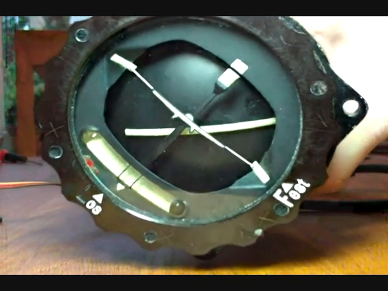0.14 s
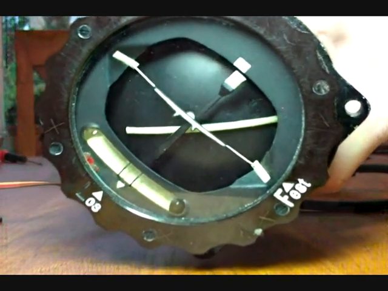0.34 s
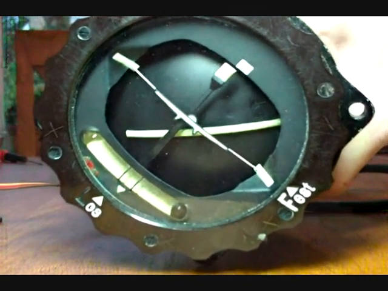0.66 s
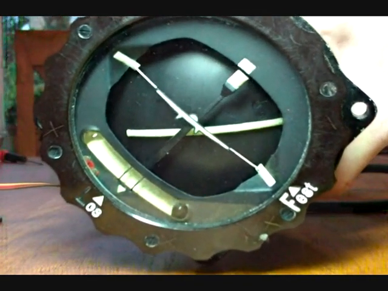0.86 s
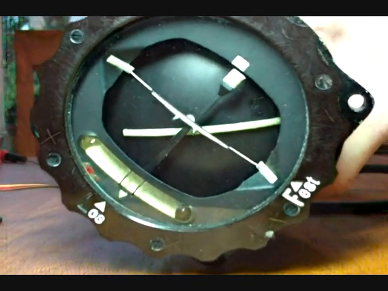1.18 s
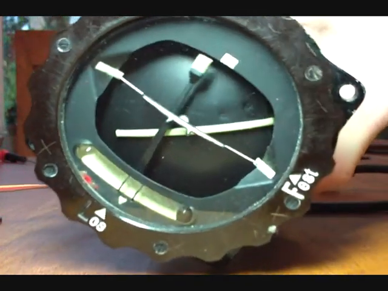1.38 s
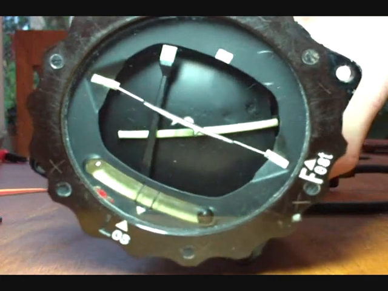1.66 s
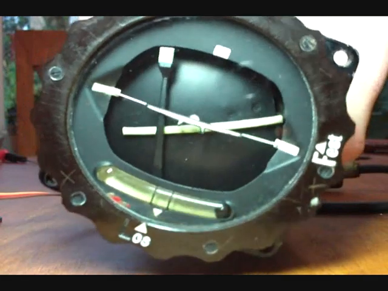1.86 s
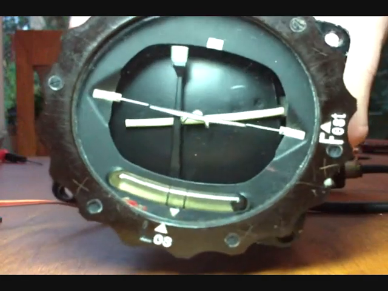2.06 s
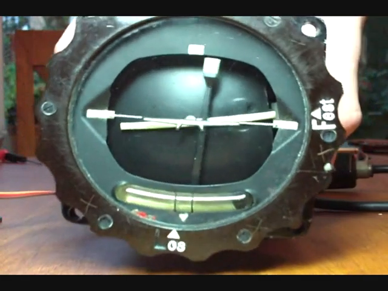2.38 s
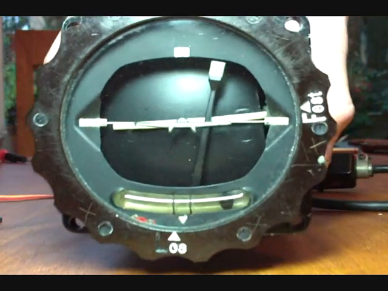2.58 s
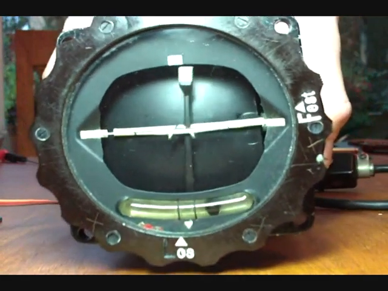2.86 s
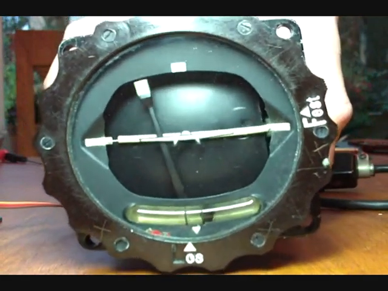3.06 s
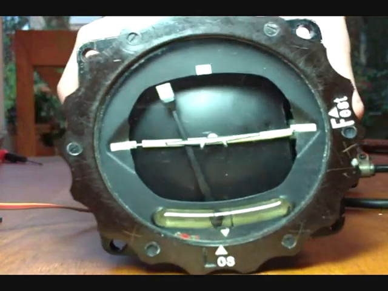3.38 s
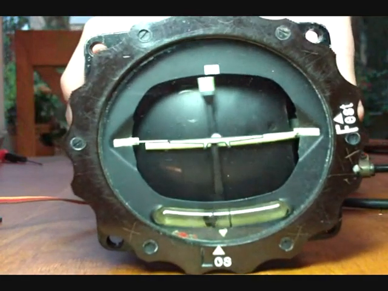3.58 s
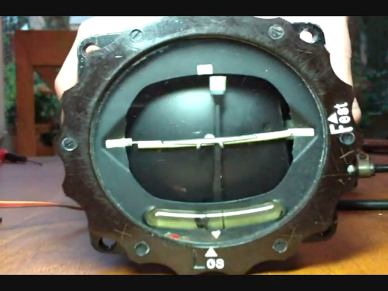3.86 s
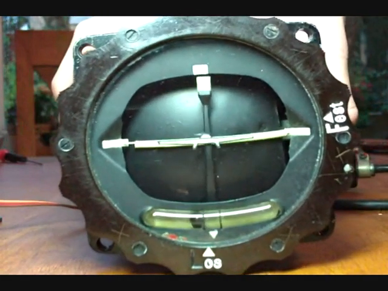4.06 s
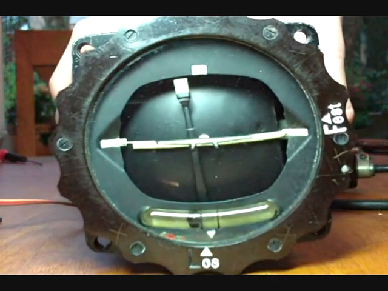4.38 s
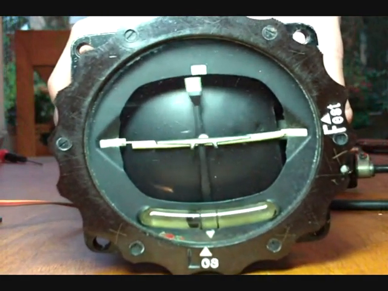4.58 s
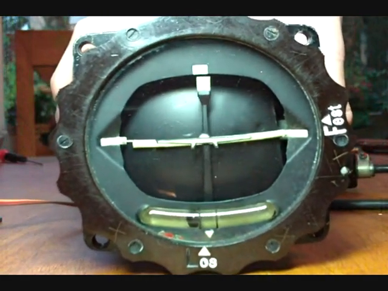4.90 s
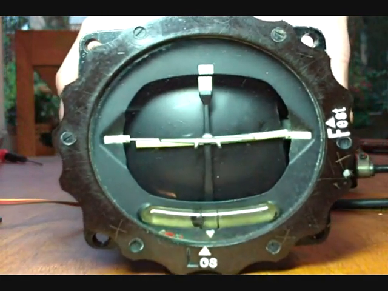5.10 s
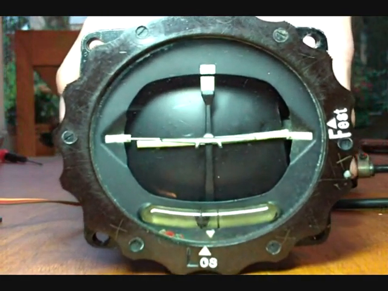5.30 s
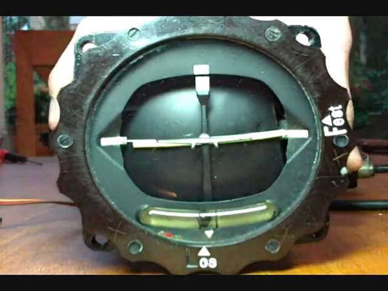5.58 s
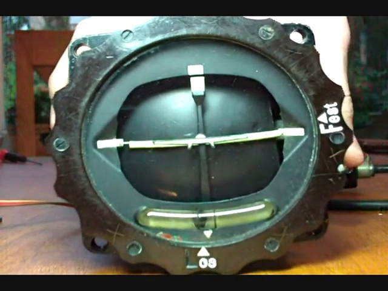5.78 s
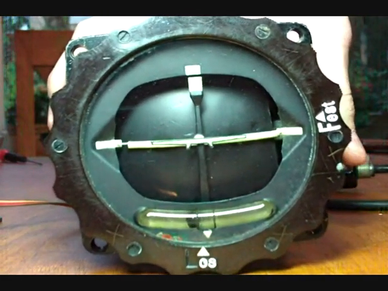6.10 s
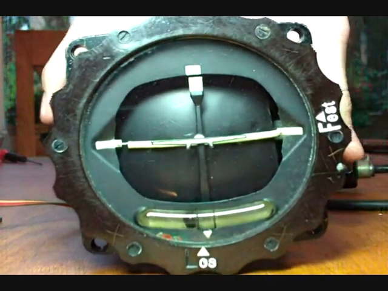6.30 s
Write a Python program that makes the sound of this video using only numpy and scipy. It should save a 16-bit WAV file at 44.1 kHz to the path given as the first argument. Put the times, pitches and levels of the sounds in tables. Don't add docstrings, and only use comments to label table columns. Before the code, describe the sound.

From 0 s an electric gyro instrument is already running at full, practically unchanging speed, close to a cheap microphone over a wooden bench. A strong low hum near 120 Hz carries a dense, nasal whine around 1 kHz, thinner higher motor tones, a slow beating about once a second, and rough hiss from air and bearings, fluttering with tiny jolts. The treble is dull and slightly grainy. Soft low handling thumps come near 0.2 and 1.5 s. From about 1.9 to 2.7 s the casing is rolled level and some whines swell while others fade. More muffled bumps and faint creaks cluster at 3.0-3.6 s. Around 4.7-5.1 s it is pressed to the bench, with a creak and a fuller lower ring; a small shift follows near 5.9 s. At 6.28-6.33 s several rapid, hard wooden knocks with metallic rattle overload the microphone, ringing briefly until the abrupt end near 6.4 s.

```python
import sys
import numpy as np
from scipy import signal
from scipy.fft import rfft, irfft
from scipy.io import wavfile
from scipy.ndimage import uniform_filter1d

SR = 44100
rng = np.random.default_rng(int(sys.argv[2]) if len(sys.argv) > 2 else 0)


def int16_out(signal):
    q = np.round(np.clip(np.atleast_2d(signal).T, -1, 1) * 32767)
    wavfile.write(sys.argv[1], SR, q.astype(np.int16))


def voltage_ratio(level):
    return 10 ** (np.asarray(level, float) / 20)


N = 284004
SHAFT_HZ = 122.14

# t/s, speed change/%
SPEED_DRIFT = [(0, 0), (1.6, 0), (2.1, .03), (3, .005), (4, 0), (5, 0), (6.44, -.012)]
# t/s, rolled level/0-1, pressed on the bench/0-1
POSE = [
    (0, 0.2, 0.15),
    (1.9, 0, 0),
    (2.25, 0.5, 0.1),
    (2.7, 0.95, 0.01),
    (4.5, 1, 0.2),
    (4.75, 0.97, .45),
    (4.98, 0.89, 0.9),
    (6.44, 0.9, 1),
]
SHAFT_ORDERS = [2, 5, 7, 16, 21, 22, 23, 24, 25, 26, 27, 28, 29, 30, 31, 36, 37, 38, 40, 43, 45, 47, 52, 55,
                59, 60]
SHAFT_DB = [-39, -45, -37, -38, -51, -54, -56, -50, -46, -56, -61, -58, -59, -59, -57, -56, -57, -61, -61,
            -61, -58, -66, -70, -60, -66, -70]
MOTOR_HZ = [100.3, 240.9, 490.6, 862, 1597.5, 1845, 1928.6, 1962.8, 2249.5, 2331.2, 2336.8, 2458.8, 2575.9,
            2664.1, 2950.7, 3072.5, 4293.9, 4784.4, 5028.7, 5409.5, 5437.8]
MOTOR_DB = [-47, -44, -43, -39, -48, -30.5, -47, -43, -49, -42, -46, -52, -52, -51, -48, -52, -56, -59, -59,
            -56, -57]
BEAMED_HZ = [440.1, 582.7, 766.4, 880.2, 1018.1, 1181.7, 1206, 1319.8, 1646.6, 1760.3, 2062.3, 2087]
# tilted level/dB, change when level/dB, change when pressed/dB, creep/(Hz/s)
BEAMED = [(-43, -3, 8, 0), (-52, 2, 8, 0), (-30, 0, -7, .12), (-40, 14.5, -2, .06), (-42, 6, 2, 0),
          (-33, -6, -3, .2), (-30, -10, -3, .25), (-33, -5, -2, .2), (-54, 3, -2, .25), (-50, 1, 2, .1),
          (-45, 4, -4, .3), (-51, 3, 1, .3)]
SING_HZ = [234.8, 470.2, 704.6, 939.6, 971.2]
SING_WANDER_HZ = [.4, 1, 1, 1.17, 1.995]
# tilted level/dB, change when level/dB, change when pressed/dB, dropout depth/dB, shake share/0-1
SING = [(-46.5, 6, 19, 0.6, 0), (-43.5, 3, -0.5, 4.5, 0.2), (-39.5, 3, 0.5, 2, .3),
        (-24, -0.5, 1.5, 3.5, 0.1), (-23, 1.5, -3.5, 3.5, .7)]
# middle t/s, length/s, rise/dB
SWELLS = [
    [(1.6, .15, 8), (2.0, 0.34, 5), (4.48, 0.17, 6)],
    [(1.76, 0.27, 15), (2.6, 1.1, 13), (3.6, 1.6, 10.5), (4.31, 0.17, 6), (4.93, .2, 10.5), (5.45, 0.34, 6)],
    [(.62, 0.33, 8), (1.8, 0.7, 5), (2.96, 0.22, 8.5), (3.72, 0.53, 6.5), (4.25, 0.31, 8), (4.7, 0.6, 9.5),
     (5.55, 0.48, 7.5)],
    [(.38, 0.47, 5), (1.0, .6, 3.5), (1.5, 0.17, 6), (2.05, 1, 6), (2.9, 0.74, 2.5), (3.55, 0.5, -9),
     (5.55, 1.0, 8), (6.03, 0.24, 3)],
    [(2.0, .5, 4.5), (2.6, 0.63, 4), (3.5, 0.56, 1), (4.12, 0.19, 4.5), (4.5, 0.37, 3), (4.9, .5, 2.5),
     (5.7, .3, 2.5)],
]
# t/s, level/dB
SHAKE = [(0.0, -18.5), (0.03, -26), (0.31, -18.5), (0.84, -20), (0.87, -17.5), (1.46, -23), (1.53, -14.5),
         (1.6, -24), (1.92, -17), (2.14, -21), (3.9, -17), (4.15, -12.5), (4.17, -17.5), (4.92, -18),
         (5.75, -14.5), (5.8, -18.5), (6.26, -18), (6.4, -20)]
# middle t/s, length/s, rise/dB
JOLTS = [(.14, .06, 6.5), (.47, 0.073, 4.5), (.64, .06, 4.5), (1.13, .08, 3), (1.33, .08, 6.5),
         (1.52, 0.11, 3.5), (2.3, .1, 3), (2.47, 0.091, 3), (2.72, .08, 6), (2.87, .1, 6.5), (3.33, .06, 4),
         (3.42, .1, -7), (3.62, .1, 4), (3.79, .08, 6.5), (4.72, .08, 5), (5.1, .08, 3.5), (5.43, .08, 2),
         (5.97, .06, 2.5), (6.09, .08, 3), (6.19, .08, 3), (6.26, .05, 3), (6.33, 0.057, 6.5)]
# f/Hz, level/dB per Hz
HISS = [(200, -64.5), (330, -67), (520, -59), (800, -58), (1230, -56.5), (1600, -60.5), (2000, -59.5),
        (2600, -64), (3200, -70.5), (3650, -73.5), (4400, -74.5), (5100, -75), (5900, -89), (7200, -89)]
# f/Hz, width/Hz, level/dB per Hz
CASING = [(480.4, 17, -53), (644, 80, -58), (717, 60, -51.5), (873, 13, -47), (887, 20, -51.5),
          (960, 52, -40.5), (983, 56, -43.5), (1073, 33, -51.5), (1153, 50, -54.5), (1330, 21, -47.5),
          (1406, 50, -48), (1470, 36, -49.5), (1532, 40, -53), (3942, 200, -68.5), (4425, 200, -73),
          (4630, 230, -74), (5368, 280, -70.5), (5820, 150, -81.5)]
# middle t/s, length/s, thump rise/dB, creak rise/dB
SHIFTS = [(.2, 0.18, 19, -4), (1.48, 0.14, 14, 10), (2.17, 0.2, 5, 10), (2.52, .1, 10, -7),
          (3.04, .2, 20, 6), (3.12, .16, 6, 16), (3.2, .2, 21, 8), (3.42, .25, 15, 12), (3.64, .1, 20, -2),
          (4.11, .1, -2, 6), (4.84, 0.25, 3, 12), (5.08, .14, 15, 6), (5.81, 0.09, 8, 5),
          (5.94, 0.11, 8, 4)]
# t/s, blow/dB, contact/ms, wood mids/dB, casing ring/dB
KNOCKS = [
    (6.2755, -.5, 1.5, -12, -5),
    (6.2868, -12, 0.58, -6, 4),
    (6.2935, 0, 1.2, -2, -4),
    (6.3, -5, 1, 5.5, -5),
    (6.316, -13, 1.7, -4, -9),
    (6.324, -2, 1.2, -9, 0),
    (6.328, -5.5, 0.39, -8.5, 11),
]
# f/Hz, level/dB, decay by 60 dB/s
WOOD = [(135, -1, 0.15), (202, 2.5, 0.1), (380, -12, 0.042), (468, -1, 0.12), (488, -9.5, 0.061),
        (637, 10, 0.059), (910, -8.5, 0.044), (1040, -4.5, .07)]
# f/Hz, step/dB
ROUNDING_STEP = [(0, -46), (1500, -33), (2600, -23), (3300, -20), (4000, -18), (5400, -19.5), (5800, -27),
                 (6100, -30), (6600, -31), (7400, -30)]


def curves(table):
    s, *columns = np.transpose(table)
    return [np.interp(np.arange(N) / SR, s, c) for c in columns]


def swells(rows):
    s, length, *rises = np.transpose(rows)
    phase = (np.arange(N) / SR - s[:, None]) / length[:, None]
    shape = np.cos(np.pi * np.clip(phase, -.5, .5)) ** 2
    return [db @ shape for db in rises]


def walk(rate):
    hold = int(SR / rate)
    steps = np.repeat(rng.standard_normal(N // hold + 1), hold)
    w = uniform_filter1d(uniform_filter1d(steps, hold), hold)[:N]
    return w / w.std()


def tone(cycles, db):
    return np.sqrt(2) * voltage_ratio(db) * np.sin(2 * np.pi * (cycles + rng.random()))


def shaped(x, gain):
    y = irfft(rfft(x) * gain, N)
    return y / y.std()


def peak(f, hz, width):
    return 1 / (1 + (2 * (f - hz) / width) ** 2)


def shake():
    db, = curves(SHAKE)
    return db - db.mean() + swells(JOLTS)[0]


def bench(f):
    thump_db, creak_db = swells(SHIFTS)
    rumble = shaped(rng.standard_normal(N), 1 / np.sqrt((1 + (f / 110) ** 6) * (1 + (15 / f) ** 4)))
    thump = shaped(rng.standard_normal(N), peak(f, 49, 70) ** 2)
    creak = shaped(rng.standard_normal(N), peak(f, 250, 330))
    out = rumble * voltage_ratio(-43.5 + 1.2 * walk(7.3))
    out += thump * voltage_ratio(-50.5 + thump_db)
    return out + creak * voltage_ratio(-49.5 + creak_db + 3.5 * walk(12))


def hiss(f):
    level, pressed = curves(POSE)
    hiss_db = 0.6 * level - 0.24 * pressed
    ring_db = .9 * shake() + 0.7 * walk(6)
    hz, db = np.transpose(HISS)
    floor = voltage_ratio(np.interp(np.log(f), np.log(hz), db)) ** 2 / (1 + (150 / f) ** 4)
    floor *= 1 + (f > 5800) * .9 * np.cos(2 * np.pi * f / SHAFT_HZ)
    power = floor + sum(voltage_ratio(db) ** 2 * peak(f, hz, w) ** 1.42 for hz, w, db in CASING)
    air = np.sqrt(np.sum(power) * SR / N) * shaped(rng.standard_normal(N), np.sqrt(power))
    centre = irfft(rfft(air) * peak(f, 980, 280) ** 2, N)
    rest = air - centre
    low = irfft(rfft(rest) / (1 + (f / 1500) ** 6), N)
    lifted = rest + low * (voltage_ratio(3 * pressed ** 2) - 1)
    return lifted * voltage_ratio(hiss_db - hiss_db.mean()) + centre * voltage_ratio(ring_db - ring_db.mean())


def casing():
    level, pressed = curves(POSE)
    drive = shake()
    out = np.zeros(N)
    for hz, wander, mode, rows in zip(SING_HZ, SING_WANDER_HZ, SING, SWELLS):
        db, level_db, pressed_db, flutter_db, share = mode
        db = db + level_db * level + pressed_db * pressed + share * drive + swells(rows)[0]
        cycles = np.cumsum(hz + wander * walk(9)) / SR
        out += tone(cycles, db - flutter_db * walk(22) ** 2)
    return out


def motor(clock):
    level, pressed = curves(POSE)
    out = sum(tone(hz * clock, db) for hz, db in zip(MOTOR_HZ, MOTOR_DB))
    for hz, (db, level_db, pressed_db, creep) in zip(BEAMED_HZ, BEAMED):
        cycles = hz * clock + creep * (clock - 3) ** 2 / 2
        out += tone(cycles, db + level_db * level + pressed_db * pressed + 1.9 * walk(3))
    beat_s, top_s = .93, .79
    pair = np.abs(1 + .95 * np.exp(2j * np.pi * (clock - top_s) / beat_s))
    out += pair ** .7 * tone(368.2 * clock, -44.5)
    return out + pair ** 1.23 * tone(613.9 * clock, -33 - 0.61 * pressed)


def rotor(clock):
    level, pressed = curves(POSE)
    orders = sum(tone(k * SHAFT_HZ * clock, db) for k, db in zip(SHAFT_ORDERS, SHAFT_DB))
    hum_db = -19 + 0.5 * level - 2.5 * pressed + 0.43 * walk(10)
    return tone(SHAFT_HZ * clock, hum_db) + orders


def knocks():
    out, t = np.zeros(N + SR), np.arange(SR // 4) / SR
    band = signal.butter(3, [250, 1600], "bandpass", fs=SR, output="sos")
    for s, db, ms, wood_db, metal_db in KNOCKS:
        ring = np.zeros(len(t))
        for hz, mode_db, t60 in WOOD:
            gain = voltage_ratio(mode_db + (metal_db if hz > 800 else wood_db * (hz > 300)))
            ring += gain * np.exp(-np.log(1000) * t / t60) * np.sin(2 * np.pi * hz * t)
        push = np.hanning(int(ms * SR / 1000) + 3)
        blow = np.convolve(ring, push / push.sum())[:len(t)]
        rattle = signal.sosfilt(band, rng.standard_normal(len(t))) * np.exp(-t / 0.045)
        start = int(s * SR)
        out[start:start + len(t)] -= voltage_ratio(db - 7.0) * (blow + voltage_ratio(-1.5) * rattle)
    return signal.sosfilt(signal.butter(4, 95, "highpass", fs=SR, output="sos"), out[:N])


def scene():
    f = np.arange(N // 2 + 1) * SR / N + .01
    clock = np.cumsum(1 + curves(SPEED_DRIFT)[0] / 100) / SR
    return (bench(f) + hiss(f) + casing() + motor(clock) + rotor(clock) + knocks())[None]


def bend(x, knee, top):
    over = np.clip((np.abs(x) - knee) / (2 * (top - knee)), 0, 1)
    return np.sign(x) * (np.minimum(np.abs(x), knee) + (top - knee) * over * (2 - over))


def coarse_rounding(x):
    frame, band, top_hz = 1152, 7, 7380
    bins = np.arange(int(top_hz / SR * 2 * frame)) + .5
    n = np.arange(2 * frame) + .5
    window = np.sin(np.pi * n / (2 * frame))
    basis = np.sqrt(2 / frame) * window * np.cos(np.pi / frame * np.outer(bins, n + frame / 2))
    count = N // frame + 3
    blocks = np.pad(x, (frame, (count - 1) * frame - N), "reflect").reshape(count, frame)
    c = np.hstack([blocks[:-1], blocks[1:]]) @ basis.T
    scatter = rng.standard_normal((count - 1, len(bins) // band + 1))
    scatter = np.repeat(scatter, band, axis=1)[:, :len(bins)]
    step_db = np.interp(bins * SR / 2 / frame, *np.transpose(ROUNDING_STEP))
    step = voltage_ratio(step_db + 2.5 * scatter)
    rounded = np.sign(c) * step * np.floor(np.abs(c / step) ** .75 + .4054) ** (4 / 3)
    frames = rounded @ basis
    return (frames[1:, :frame] + frames[:-1, frame:]).ravel()[:N]


def low_pass(x):
    return signal.sosfilt(signal.butter(12, 16000, fs=SR, output="sos"), x)


def record(dry):
    preamp = bend(dry[0], .72, 1.0)
    mix = bend(coarse_rounding(preamp)[None], .9, .95)
    return low_pass(mix)


dry = scene()
out = record(dry)
int16_out(out)
```